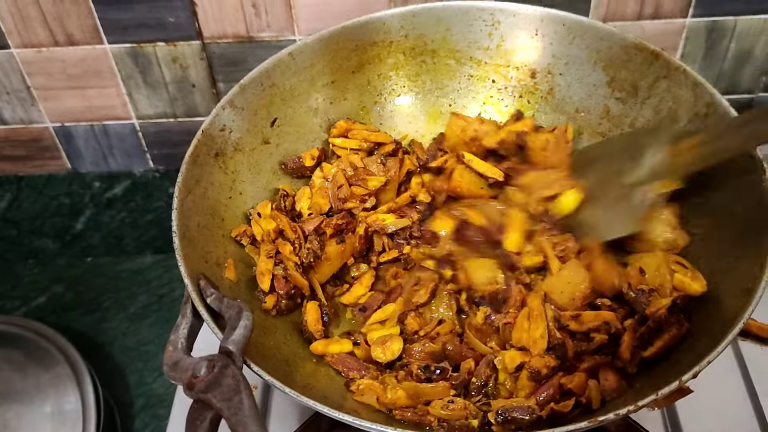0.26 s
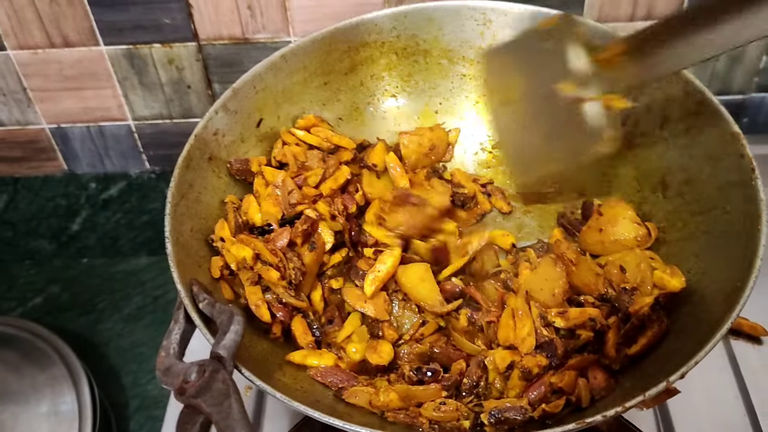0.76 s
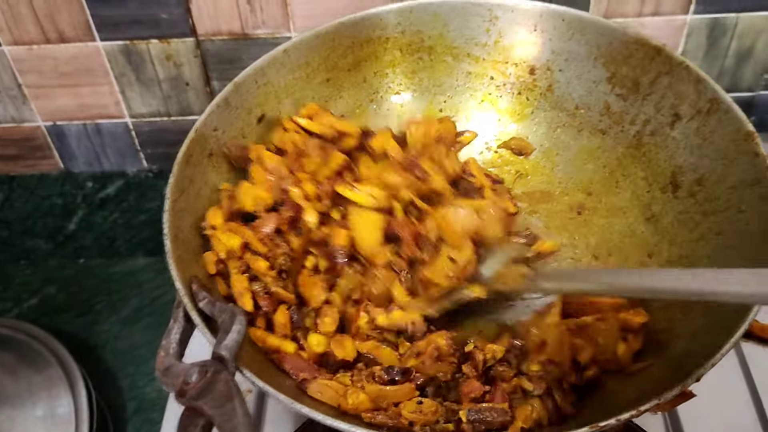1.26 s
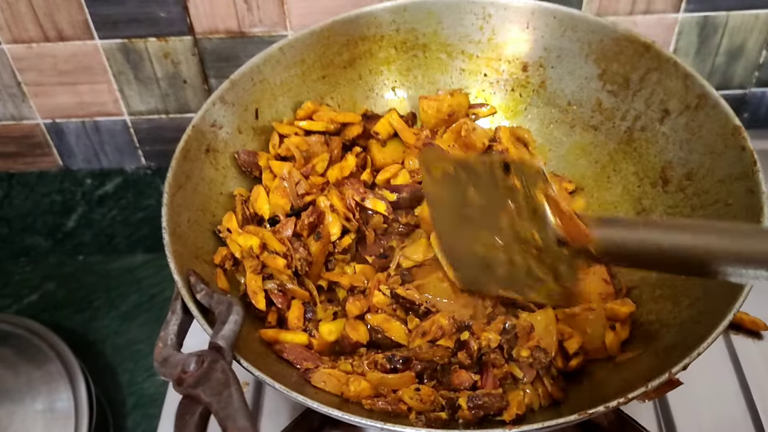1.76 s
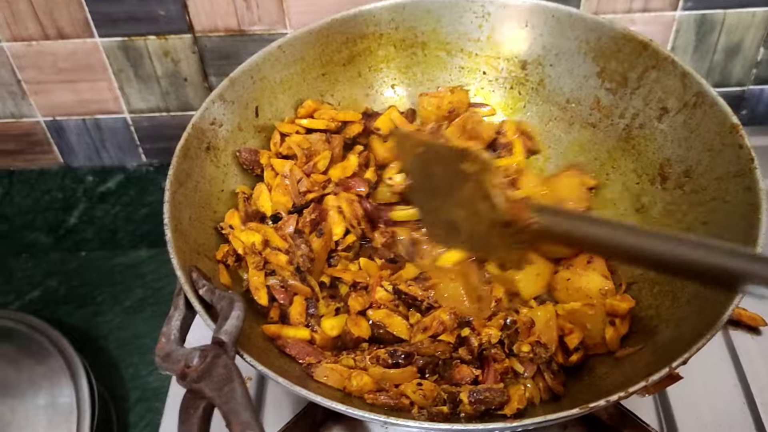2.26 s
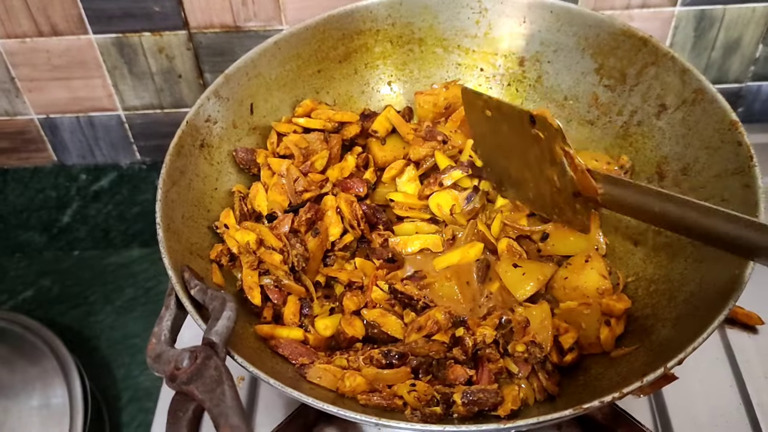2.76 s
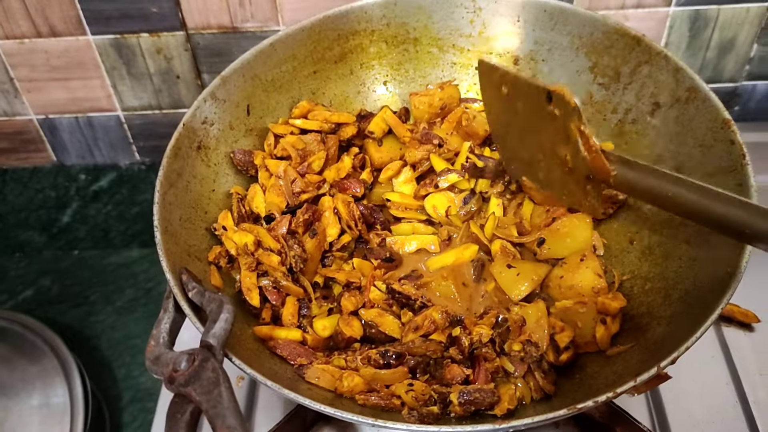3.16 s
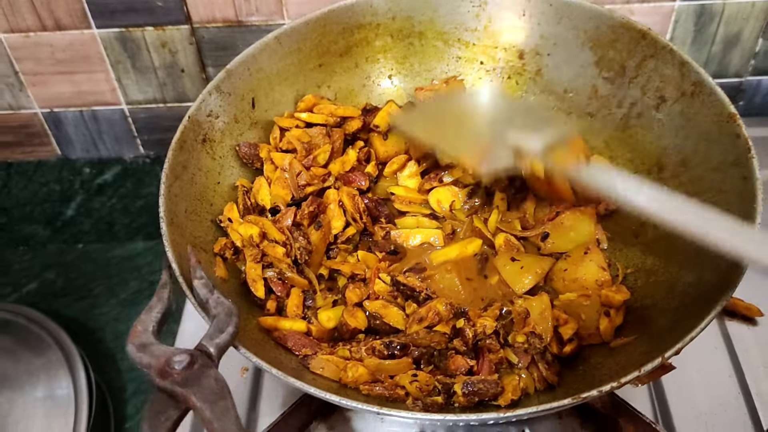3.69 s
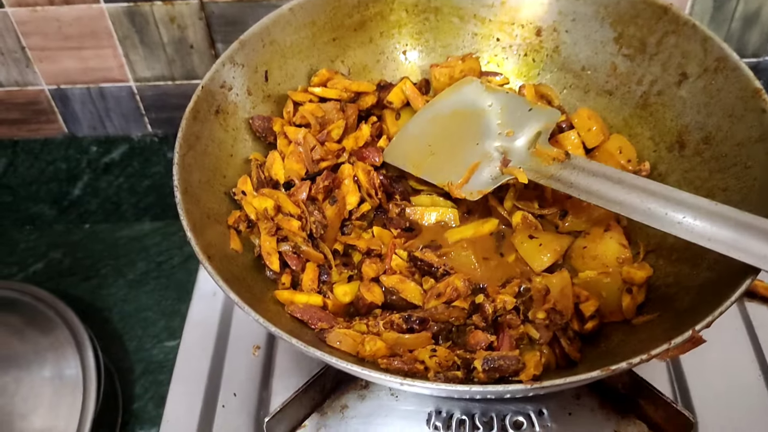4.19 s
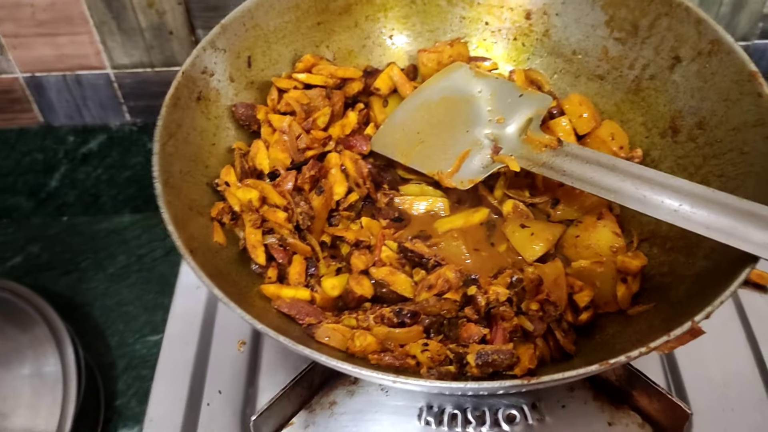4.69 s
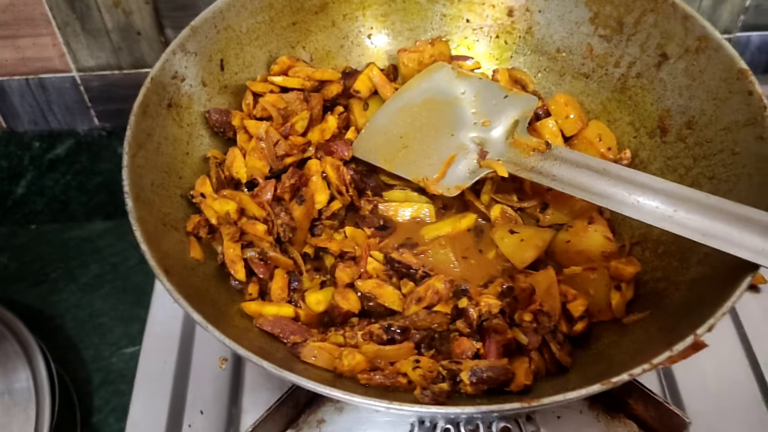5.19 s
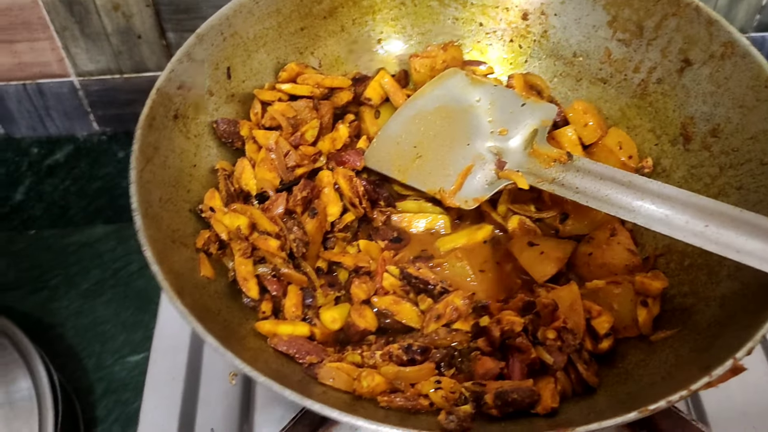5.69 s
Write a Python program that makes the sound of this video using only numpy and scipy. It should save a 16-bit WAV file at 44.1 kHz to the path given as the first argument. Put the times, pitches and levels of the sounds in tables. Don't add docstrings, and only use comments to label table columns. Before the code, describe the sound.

A phone close to the stove hears crackling oil, strongest at the start and soon faint, and a soft gas flame. Bright gritty spatula strokes and light knocks come first, then a sharp metallic blow. Later a rim knock, a ringing clack of tongs and, near the end, three clanks of steel dishes on the worktop, the last brightest, with short tile echo.

```python
import sys
import numpy as np
from scipy import signal
from scipy.fft import rfft, irfft
from scipy.io import wavfile
from scipy.ndimage import uniform_filter1d

SR = 44100
rng = np.random.default_rng(int(sys.argv[2]) if len(sys.argv) > 2 else 0)


def field_ratio(decibels):
    return 10 ** (np.asarray(decibels, dtype=float) / 20)


def master(y):
    cut = np.clip(np.atleast_2d(y).T, -1, 1)
    pcm = np.round(cut * 32767)
    wavfile.write(sys.argv[1], SR, pcm.astype(np.int16))


N = 261954

# time_s, level_db
SIZZLE_LEVEL = [(0.0, -37.5), (0.3, -42), (0.76, -48.5), (1.01, -46), (1.26, -43.5), (1.4, -48),
                (1.82, -52), (3.52, -54), (3.95, -53), (4.68, -53.5), (5.34, -52.5), (5.51, -52.5),
                (5.94, -45.5)]
# frequency_hz, density_db
SIZZLE_SPECTRUM = [(300, -13.5), (500, -18.5), (1000, -8.5), (2000, -6.5), (3500, -5), (6000, -6.5),
                   (9000, -6.5), (12000, -4), (15700, -9.5), (16100, -40), (18000, -67)]
FLAME_DB, BOOM_DB = -54.5, -56
# start_s, length_s, boom_db
SHIFTS = [
    (0.063, 0.37196, -43),
    (0.98, 0.25, -51.5),
    (1.553, 0.1, -61),
    (3.02, 0.038, -55),
    (3.625, 0.27, -46),
    (4.204, 0.2, -58.5),
    (4.88, 0.27, -54.5),
    (5.498, 0.16, -56),
]
# start_s, length_s, flame_db
GUSTS = [
    (0.4, 0.071, -54),
    (0.85, 0.0886, -57),
    (4.25, 0.17, -52),
    (5.3, 0.1, -49.5),
    (5.72, 0.2, -59),
]
SHIFT_RISE, SHIFT_FALL_DB_PER_S = 1, 115
# frequency_hz, density_db
FLAME_SPECTRUM = [(12, -65), (20, -41), (64, -12.5), (97, 2.5), (198, -6), (236, -4), (341, -8),
                  (406, -11.5), (468, -33), (900, -59), (1170, -59), (1980, -120)]
# frequency_hz, width_hz, level_db
BOOM_MODES = [(235.5, 26.3, -2.5), (306.8, 13.1, -1), (417.4, 14.9, -1), (550, 1110, -15.5)]
STROKE_RISE, STROKE_FALL_DB_PER_S = 0.21, 162
# start_s, length_s, drag_db, bright_edge_over_drag_db
STROKES = [
    (0.0, 0.12, -48.5, 17),
    (0.224, 0.17, -46, 13.5),
    (0.453, 0.076, -45.5, 11),
    (0.608, 0.27, -58, 2),
    (0.733, 0.06, -63, 24),
    (1.004, 0.044, -35, -2),
    (1.167, 0.26, -51, 11.5),
    (3.765, 0.14, -49.5, 16.5),
]
# frequency_hz, density_db
SCRAPE_SPECTRUM = [(300, -15), (600, -7), (1700, 7), (3800, 8.5), (5500, 8), (9000, 12), (12000, 0.5),
                   (15700, -6), (16100, -35), (18000, -70)]
SHORT_T60_S, SHORTER_T60_S, HOLLOW_T60_S = 0.13, 0.12, 0.25
# start_s, crack_db, thud_db, clank_db, edge_db
SHORT_KNOCKS = [
    (0.269, -34, -48, -38.5, -44),
    (0.336, -36, -70, -39, -23),
    (0.379, -33, -61, -36, -30),
    (1.005, -7, -37.5, -26, -3),
    (1.640, -9, -39, -35, -20.5),
    (3.838, 0, -27.5, -19.5, -49),
    (4.679, -50, -55, -53, -47),
    (4.903, -2.5, -32, -23.5, -60.5),
    (5.372, 3.5, -28, -20, -1.5),
]
# start_s, crack_db, thud_db, clank_db, edge_db
SHORTER_KNOCKS = [
    (0.45, -13, -41, -31.5, -22.5),
    (0.518, -34, -43, -38, -45.5),
    (0.599, -28, -38, -37.5, -34.5),
    (3.065, -10, -31.5, -25.5, -17.5),
    (3.899, -33, -28, -26, -48),
    (4.059, -52, -48, -59, -55),
    (5.354, -8.5, -27.5, -26.5, -27),
]
# start_s, crack_db, thud_db, clank_db, edge_db
HOLLOW = [
    (3.237, -52, -40.5, -46, -45),
    (4.827, -3.5, -31.5, -30.5, -21),
]
# frequency_hz, level_db, t60_s
BLADE = [(6562, -4, 0.55), (7585, -2, 0.2), (8269, -2, 0.32), (8635, 1, 0.22), (9076, -9, 0.2),
         (9878, -3, 0.19), (10410, -4, 0.5), (10850, 0, 0.33), (11050, -9, 0.33), (11350, -3, 0.23),
         (11620, -3, 0.32), (12310, 0, 0.35), (12860, -15, 0.6), (14300, -4, 0.17), (2627, -9, .13),
         (3284, -10, .18), (3461, -3, .3), (3989, -6, .25), (4124, -5, .2), (4689, -3, .3), (5125, -1, .2),
         (6169, -8, .2), (6800, -5, .3)]
# frequency_hz, level_db, t60_s
GRIP = [(1927, 1, 1.1), (2557, -6.5, .8), (3300, -13, .72), (4700, -18, .72)]
# frequency_hz, level_db, t60_s
RIM = [(2440, -4, 0.16), (2700, -9, 0.12), (6280.0, -12, 0.2), (7070, -16, 0.3), (7540, -10, 0.2),
       (8200, -10, 0.25), (10300, -9, 0.15), (10910, 2, 0.077), (12700, -13, 0.3), (1500, 4, 0.05),
       (1766, -3.5, .22), (2020, -14.5, 0.2), (1125, -5, 0.099), (656, -12, .3), (4030, -4, 0.09),
       (4640, -5, 0.12)]
# frequency_hz, level_db, t60_s
WALL = [(1364, -5.5, 0.35), (1270, 1, 0.2), (713, 1.5, 0.054), (607, 3, 0.1), (2020, -1, 0.031),
        (2910, -5.5, 0.086), (5100, -6, 0.27)]
# frequency_hz, level_db, t60_s
CORNER = [(6450, 3, .12), (10550, 3, .12), (8900, -3, 0.09)]
# frequency_hz, level_db, t60_s
BOTTOM = [(817, -9, 0.2), (1074, -2.5, 0.33), (1650, -5, 0.071), (2380, -4, 0.11), (3070, 4.5, 0.031)]
# frequency_hz, level_db, t60_s
LIP = [(628, -1.5, 0.25), (1047, -2, 0.27), (1323, -7, 0.267), (1693, 7.5, 0.14), (3190, -14, 0.32)]
# frequency_hz, level_db, t60_s
WELL = [(2874, -13, .22), (4756, -8, .35), (5771, 1, .4), (5200, -10, .3), (5000, -12, .25),
        (3822, -12, .3)]
# frequency_hz, level_db, t60_s
WORKTOP = [(206, 0, 0.24), (300, 0, 0.26), (439, 0, 0.23)]
# frequency_hz, level_db, t60_s
SHELF = [(243.4, 0.5, 0.11), (303.8, 2, 0.24), (557, -4, 0.27), (197, -7, 0.19)]
PAIRED, CROWDED = .0025, .03
RING_SWELL_S = .0025
# frequency_hz, level_db, t60_s
TIP = [(3520, 7, 0.091), (4320, 2, 0.09), (1960, -21, 0.084)]
# frequency_hz, level_db, t60_s
TONGS = [(3531, 1, 0.33), (3980, -14, 0.5), (4425, -2, 0.22), (5070, -9, 0.2), (5125, -5, 0.1),
         (5308, -12, .2), (6000, -6.5, 0.16), (6240, -3, 0.16), (6930, 0.5, 0.099), (8048, -7.5, 0.23),
         (9033, -7, 0.087), (10300, -8, 0.13), (11780, -17, 0.25), (1050, -1, 0.27), (1720, -0.76, 0.21)]
# frequency_hz, level_db, t60_s
CUP = [(3840, -3, 0.088), (4580, -1, 0.2), (5470, -4, 0.3), (6013, -4, 0.14), (6800, -4, 0.26),
       (7930, -2, .15), (8400, -8, 0.3), (10800, -8, .2), (11300, 0, 0.1), (12380, -11, 0.24),
       (13300, -3, 0.16), (14030, 1, 0.3), (15720, -22, 0.3)]
# frequency_hz, level_db, t60_s
BOWL = [(728, -4, 0.13), (845, -5, 0.097), (1400, -12, 0.25), (3210, -2.5, 0.2), (3500, 0, 0.15),
        (3970, -3, 0.15), (4130, -7, 0.17), (4554, -8, .07), (5450, -11, .3), (6164, -7, .1),
        (7763, -8, .12), (8910, -12, .3), (10300, -14, 0.24), (11280, -14, 0.13)]
# frequency_hz, level_db, t60_s
PLATE = [(2874, -10, .3), (8437, -5, .45), (3822, -20, .4), (4756, -10, .4), (5200, -15, .3),
         (5771, -7, .42), (8410, -8, .45), (6718, -20, .3), (7302, -11, .4), (7811, -11, .4),
         (8376, -11, .4), (8424, 0, .45), (9256, -11, .33), (10470, -22, .4), (10816, -11, .35),
         (11265, -10, .35), (11418, -10, .36), (11659, -6.5, .33), (12305, -18, .3), (13317, -12, .37),
         (13640, -16, .25), (14170, -19, .4), (15673, -8, .25)]
# start_s, object_modes, ring_db, rattle_s, longest_t60_s, cluster_spread_0_to_1, left_minus_right_db
RINGS = [(.372, CORNER, -40, 0, 0.11, CROWDED, 5), (0.448, BOTTOM, -33.5, 0.0055, 0.15, 0.15, -2),
         (0.469, LIP, -44.5, 0.033, 0.12, 0.06, 3), (.518, TIP, -40, 0.0033, 0.15, 0.16, 2),
         (.599, WALL, -45, 0.0058, 0.1, 0.05, 1), (1.005, BLADE, -28.5, 0.025, 0.17, 0.03, -1.5),
         (1.639, WALL, -40.5, 0.01, 0.25, CROWDED, -5), (3.065, RIM, -32.5, 0.0075, 0.2, CROWDED, 0.),
         (3.838, TONGS, -34, 0.054, 0.24, CROWDED, 1.5), (3.838, GRIP, -38.5, 0, 1.5, .001, -4),
         (3.86, LIP, -40, 0.074, 0.24, 0.06, 3), (4.825, CUP, -36, 0.024, 0.18, CROWDED, -2),
         (4.829, WORKTOP, -33, 0, 0.22, 0.01, 1), (4.903, BOWL, -30.5, 0.033, 0.16, 0.055, -1),
         (5.352, PLATE, -35, 0, 0.25, PAIRED, -5), (5.374, PLATE, -22, 0.07, 0.4, PAIRED, 1),
         (5.376, SHELF, -28, .05, 0.21, 0.01, 4.5), (5.418, WELL, -26.5, 0.067, 0.24, 0.04, 0),
         (5.446, PLATE, -34.5, 0.032, 0.21, 0.02, -6)]
WOBBLE_RISE, WOBBLE_FALL_DB_PER_S = 0.43, 160
# start_s, length_s, rattle_db
WOBBLES = [
    (5.34, 0.029, -35.5),
    (5.364, 0.022, -25.5),
    (5.396, 0.056, -21),
]
# frequency_hz, coherence_0_to_1
PORT_LIKENESS = [(25, 0.56), (70, 1), (150, 0.87), (300, 0.93), (550, 0.22), (1650, 0.013), (4970, 0.017),
                 (15000, 0.01)]
# frequency_hz, left_minus_right_db
PORT_LEAN = [(60, -0.5), (1400, 0.5), (3100, 0), (6800, -1), (9000, -9), (12000, 14.5), (15000, 1)]
# frequency_hz, gain_db
PORT_RESPONSE = [(4000, -0.5), (5250, -0.5), (5560, -4), (5740, 0), (6400, 1), (7300, -2), (8800, 3.5),
                 (10000, 2), (11600, 1), (13500, -1.5), (15800, 2.5), (16100, -14), (17500, -63)]
# low_hz, high_hz
CLANK_HZ = (600, 4000)
# low_hz, high_hz
EDGE_HZ = (4000, 14000)
# start_s, peak_db, centre_hz
SPITS = [
    (0.122, -36, 8900),
    (0.203, -34, 10500),
    (1.3877, -28, 12300),
    (2.2394, -37, 8600),
    (2.5833, -28.5, 12300),
    (4.13, -46, 2595),
    (5.7885, -30.5, 7300),
    (5.7885, -44, 12500),
]
# time_s, peak_db, pitch_hz, cycles
TICKS = [(0.338, -24, 9000, 6.), (0.451, -29, 1800, 6.2), (0.452, -28, 700, 5), (0.602, -36.5, 1240, 17),
         (1.0036, -13, 9000, 4.), (1.0057, -8, 9500, 4.7), (1.008, -7.5, 10200, 8.1),
         (1.013, -3, 10300, 5.), (1.0146, -9, 11500, 4.), (1.0166, -8, 8800, 3.6), (1.019, -14, 10500, 4.),
         (1.617, -35, 2700, 5.), (1.641, -28.5, 730, 4), (1.652, -31, 1300, 5.6), (3.065, -21, 6400, 6),
         (3.0666, -14, 1500, 5.9), (3.0685, -20.5, 4910, 11), (3.8402, -14, 3800, 7.7),
         (4.678, -43.5, 900, 3.6), (4.8283, -13, 14000, 9.7), (4.9043, -10, 3500, 7.1),
         (5.3533, -21, 8540, 8.), (5.3641, -16, 8600, 7.3), (5.373, -11, 9000, 4.), (5.7885, -28, 7000, 3.)]
# time_s, peak_db, pitch_hz, cycles
NUDGES = [
    (0.295, -34.5, 300, 10),
    (0.39, -36, 300, 10),
    (0.604, -39, 310, 4),
    (4.065, -37, 300, 18.),
    (4.275, -43, 300, 10),
    (4.345, -38, 291.4, 13),
    (4.464, -40, 313, 11),
    (4.58, -47, 298, 14.),
    (5.134, -38.5, 307, 11),
    (5.814, -39.5, 121, 2.7),
]


def evened(x):
    return x / np.sqrt(np.mean(x ** 2) + 1e-20)


def read(points, hz):
    f, value = np.transpose(points)
    return np.interp(np.log(hz + 1), np.log(f + 1), value)


def along(rows):
    s, db = np.transpose(rows)
    return field_ratio(np.interp(np.arange(N) / SR, s, db))


def add(mix, s, sound):
    part = mix[:, round(s * SR):][:, :sound.shape[1]]
    part += sound[:, :part.shape[1]]


def pressed(start, length, rise, fall_db_per_s):
    t = np.arange(N) / SR - start
    growth = np.clip(t / (np.clip(rise, .01, 1) * length), 0, 1)
    return growth * field_ratio(-fall_db_per_s * np.maximum(t - length, 0))


def pair(x):
    z = rfft(x, axis=1)
    same = np.clip(read(PORT_LIKENESS, np.fft.rfftfreq(x.shape[1], 1 / SR)), -1, 1)
    second = same * z[0] + np.sqrt(1 - same ** 2) * z[1]
    return irfft(np.array([z[0], second]), x.shape[1], axis=1)


def colour(x, points):
    hz = np.fft.rfftfreq(x.shape[1], 1 / SR)
    return evened(irfft(rfft(x, axis=1) * field_ratio(read(points, hz)), x.shape[1], axis=1))


def passed(x, lo_hz, hi_hz):
    band = signal.butter(2, [lo_hz, hi_hz], "band", fs=SR, output="sos")
    return evened(signal.sosfilt(band, x))


def grains(per_s, spread_db, wash):
    size = field_ratio(spread_db * np.minimum(rng.exponential(1, N), 5))
    size = size * (rng.random(N) < per_s / SR)
    puff = np.sqrt(signal.lfilter([1], [1, -.96], size ** 2))
    return pair((evened(puff) + wash) * rng.standard_normal((2, N)))


def flicker(size, depth_db):
    drift = uniform_filter1d(rng.standard_normal(N), size)
    return field_ratio(depth_db * evened(uniform_filter1d(drift, size)))


def patchy(x, depth_db, bins, frames):
    z = signal.stft(x, nperseg=512, noverlap=384)[2]
    field = uniform_filter1d(rng.standard_normal(z.shape[1:]), bins, 0)
    field = uniform_filter1d(field, frames, 1)
    z = z * field_ratio(depth_db * evened(field))
    return evened(signal.istft(z, nperseg=512, noverlap=384)[1][:, :N])


def boom(x):
    hz = np.fft.rfftfreq(x.shape[1], 1 / SR)
    gain = 0
    for k, (f, width, db) in enumerate(BOOM_MODES):
        gain = gain + (-1) ** k * field_ratio(db) / (1 + 2j * (hz - f) / width)
    gain /= 1 + (190 / (hz + 1)) ** 6
    return evened(irfft(rfft(x, axis=1) * gain, x.shape[1], axis=1))


def sizzle():
    bubbles = colour(grains(per_s=6500, spread_db=4.0, wash=2.9), SIZZLE_SPECTRUM)
    fizz = patchy(bubbles, 2.9, bins=4, frames=20)
    return along(SIZZLE_LEVEL) * field_ratio(1.0) * fizz * flicker(size=2500, depth_db=2.0)


def stove():
    flame = colour(pair(rng.standard_normal((2, N))), FLAME_SPECTRUM) * flicker(size=1800, depth_db=0.5)
    room = boom(pair(rng.standard_normal((2, N)))) * flicker(size=1500, depth_db=1.6)

    def swell(rows):
        return sum(field_ratio(db) * pressed(s, length, SHIFT_RISE, SHIFT_FALL_DB_PER_S) for s, length, db in rows)

    return (field_ratio(FLAME_DB) + swell(GUSTS)) * flame + (field_ratio(BOOM_DB) + swell(SHIFTS)) * room


def strokes():
    grit = colour(grains(per_s=310, spread_db=4.0, wash=20.0), SCRAPE_SPECTRUM)
    grit = patchy(grit, 6.4, bins=3, frames=16)
    dull, bright = passed(grit, 600, 6500), passed(grit, 11400, 17930)
    total = np.zeros((2, N))
    for s, length, drag_db, edge_db in STROKES:
        effort = field_ratio(drag_db) * pressed(s, length, STROKE_RISE, STROKE_FALL_DB_PER_S)
        total += effort * (field_ratio(4.0) * dull + field_ratio(edge_db - 11.0) * bright)
    return total


def spit(peak_db, hz):
    t = np.arange(2048) / SR
    puff = passed(rng.standard_normal((2, len(t))), hz / 1.16, min(hz * 1.36, 15500))
    return field_ratio(peak_db - 6.5) * puff * (field_ratio(-60 * t / 0.0075) + field_ratio(-11.5 - 60 * t / 0.073))


def knock(peak_db, thud_db, clank_db, edge_db, t60):
    size = 10240
    t = np.arange(size) / SR
    lines = field_ratio(3 * np.minimum(rng.exponential(1, size // 2 + 1), 4))
    body = pair(irfft(rfft(rng.standard_normal((2, size)), axis=1) * lines, axis=1))
    t60 = np.clip(t60, .03, 1)
    fade = signal.windows.tukey(2 * size, .3)[size:]
    room = field_ratio(-15.0 - 60 * t / 0.76) * fade
    thud = field_ratio(thud_db + 1.0 - 60 * t / (0.35 + 0.6 * t60)) * boom(body)
    thud = thud * (1 - np.exp(-t / 0.0015))
    clank = field_ratio(clank_db) * (field_ratio(-60 * t / (1.32 * t60)) + room) * passed(body, *CLANK_HZ)
    edge = field_ratio(edge_db - 10.5) * (field_ratio(-60 * t / (0.61 * t60)) + 0.84 * room) * passed(body, *EDGE_HZ)
    crack = field_ratio(peak_db - 11.5 - 60 * t / 0.021) * passed(body[::-1, ::-1], 1300, 13800)
    crack += field_ratio(peak_db + 1.5 - 60 * t / 0.008) * passed(body[:, ::-1], 480, 8200)
    return thud * fade + (clank + edge + crack) * (1 - np.exp(-t / 0.003))


def jolt(db):
    u = np.arange(4096) / SR / 0.002
    return field_ratio(db - 10.0) * np.array([[1.1], [0.3]]) * u * (2 - u) * np.exp(-u)


def tick(peak_db, hz, cycles):
    t = np.arange(-2048, 2048) / SR
    turns = rng.random() + np.array([[0], [.25 * min(hz / 1500, 1)]])
    envelope = np.exp(-(3 * t * hz / max(cycles, 1)) ** 2)
    return field_ratio(peak_db) * envelope * np.sin(2 * np.pi * (hz * t + turns))


def ring(modes, db, rattle_s, longest_s, spread, pan_db):
    contacts = rng.standard_normal((3, SR)) * (rng.random(SR) < 1200 / SR)
    contacts = contacts * (np.arange(SR) < rattle_s * SR) * 0.12
    contacts = contacts[:2] + 0.74 * contacts[2]
    contacts[:, 0] = 1
    size = round(SR * np.clip(rattle_s + 0.65 * longest_s, .1, 1))
    soft = np.exp(-1 / (RING_SWELL_S * SR))
    sound = np.zeros((2, size))
    for hz, level_db, t60 in modes:
        members = 1 if t60 >= .7 or spread < .002 else 3 if spread < .02 else 6
        for k, (split, phase, skew) in enumerate(rng.random((6, 3))[:members]):
            phases = np.array([phase, phase + (.17 + .16 * skew) * min(hz / 900, 1)])
            detune = 1 + spread * (k > 0) * (2 * split - 1)
            turn = np.exp(2j * np.pi * hz * detune / SR)
            pole = field_ratio(-60 / np.clip(t60, .04, longest_s) / SR) * turn
            swing = signal.lfilter([1 - soft], np.poly([pole, soft * turn]), contacts[:, :size])
            weaker_db = 4.1 * k if spread < .02 else 3.5 + 0.68 * k
            sound += field_ratio(level_db - weaker_db) * (np.exp(2j * np.pi * phases)[:, None] * swing).imag
    gain = field_ratio(db + np.array([[.5], [-.5]]) * pan_db)
    return gain * sound * signal.windows.tukey(2 * size, .3)[size:]


def tile_reverberation(x, wet_db, t60):
    t = np.arange(8192) / SR
    tail = rng.standard_normal((2, len(t))) * field_ratio(-60 * t / t60) * (t > .004)
    tail = tail / np.linalg.norm(tail[0])
    return x + field_ratio(wet_db) * signal.fftconvolve(x, tail, axes=1)[:, :N]


def wobble():
    drum = grains(per_s=1100, spread_db=3.0, wash=5.7)
    low = passed(boom(drum) + 1.2 * passed(drum, 545, 660), 155, 1600)
    effort = sum(field_ratio(db) * pressed(s, length, WOBBLE_RISE, WOBBLE_FALL_DB_PER_S) for s, length, db in WOBBLES)
    return effort * (field_ratio(-4.0) * low + field_ratio(-1.5) * passed(drum, 788, 7900))


def scene():
    mix = sizzle() + stove() + strokes() + wobble()
    steel = np.zeros((2, N))
    for s, *burst in SPITS:
        add(mix, s - .0005, spit(*burst))
    for rows, t60 in [(SHORT_KNOCKS, SHORT_T60_S), (SHORTER_KNOCKS, SHORTER_T60_S), (HOLLOW, HOLLOW_T60_S)]:
        for s, peak_db, thud_db, clank_db, edge_db in rows:
            add(mix, s - .001, knock(peak_db, thud_db, clank_db, edge_db, t60))
            add(mix, s, jolt(thud_db))
    for s, *contact in TICKS + NUDGES:
        add(mix, s - 2048 / SR, tick(*contact))
    for s, *struck in RINGS:
        add(steel, s, ring(*struck))
    return mix + tile_reverberation(steel, wet_db=-6.0, t60=0.34)


def band_limit(x):
    return signal.sosfilt(signal.butter(12, 16960, fs=SR, output="sos"), x)


def record(dry):
    hz = np.fft.rfftfreq(N, 1 / SR)
    lean_db = read(PORT_LEAN, hz) / 2
    gain = field_ratio(read(PORT_RESPONSE, hz) + np.array([lean_db, -lean_db]))
    ports = irfft(rfft(dry, axis=1) * gain, N, axis=1)
    return band_limit(ports)


dry = scene()
out = record(dry)
master(out)
```